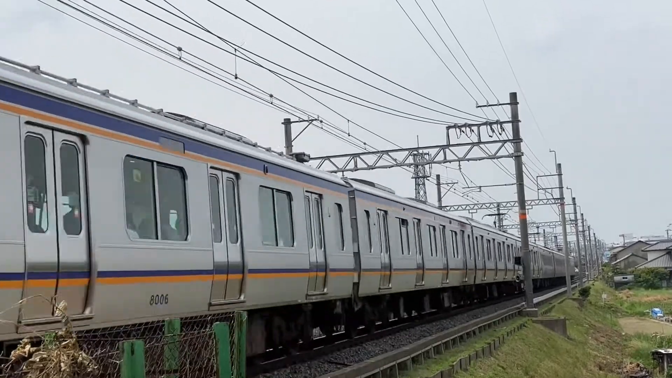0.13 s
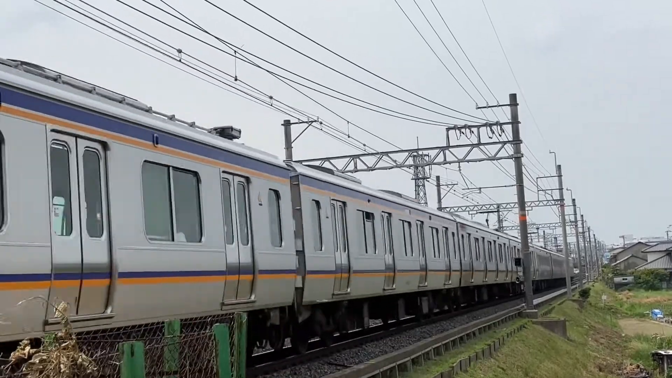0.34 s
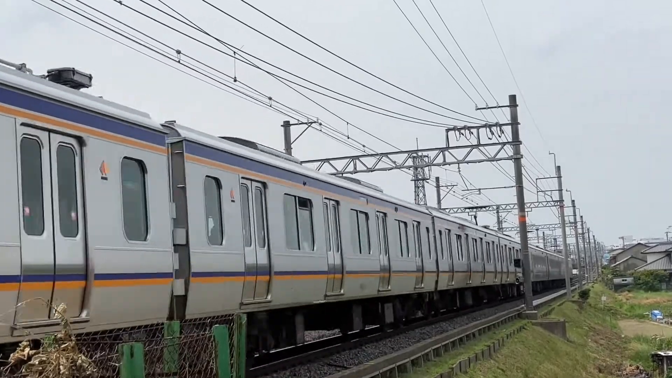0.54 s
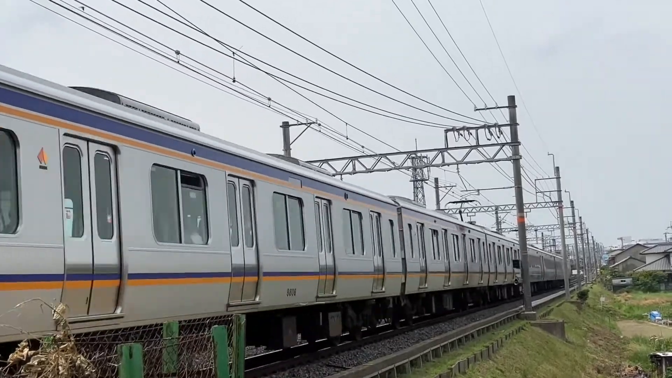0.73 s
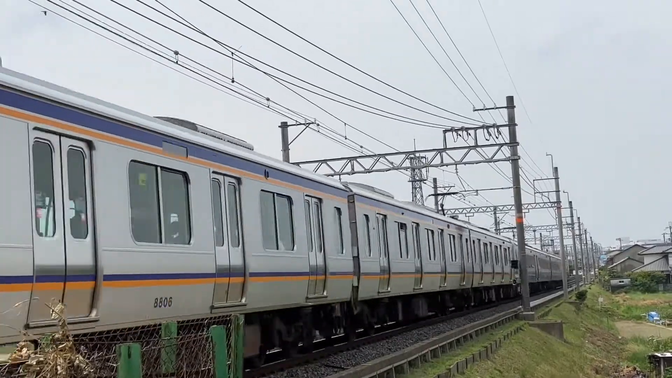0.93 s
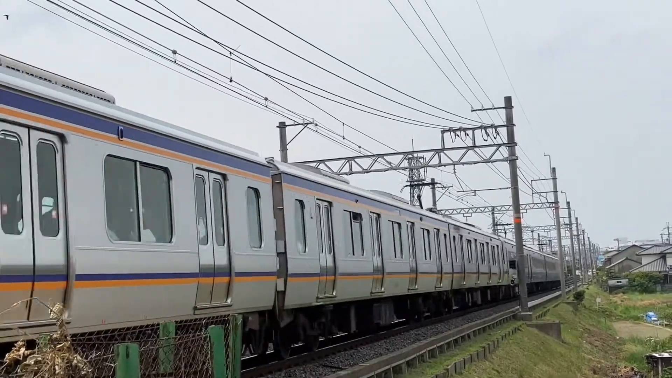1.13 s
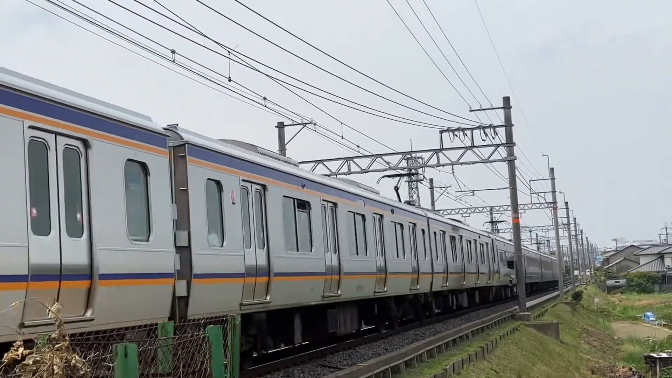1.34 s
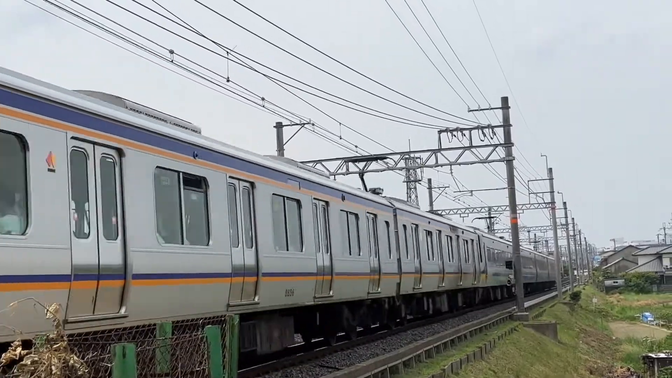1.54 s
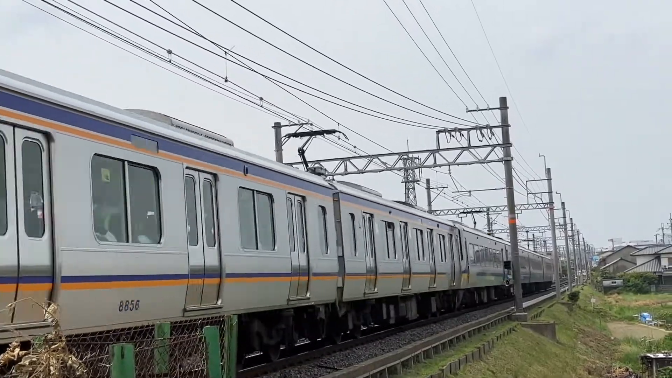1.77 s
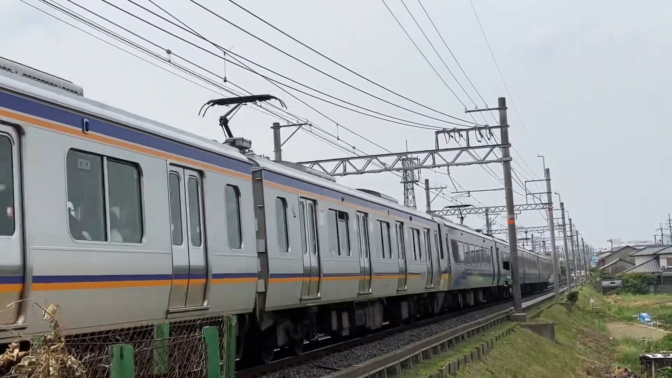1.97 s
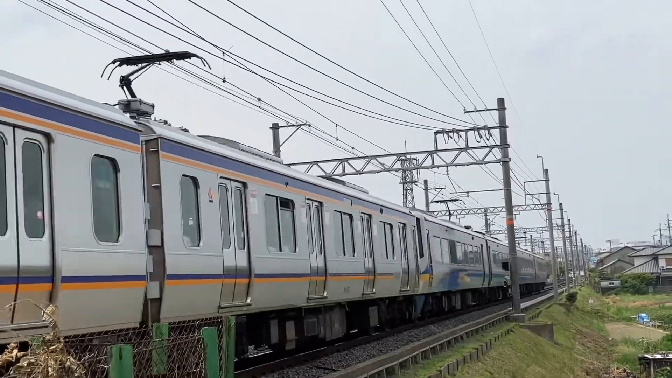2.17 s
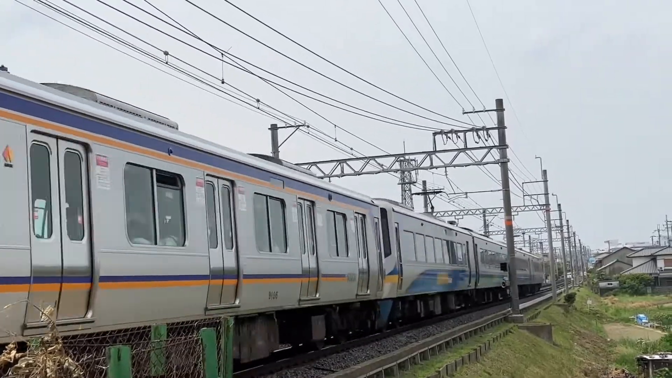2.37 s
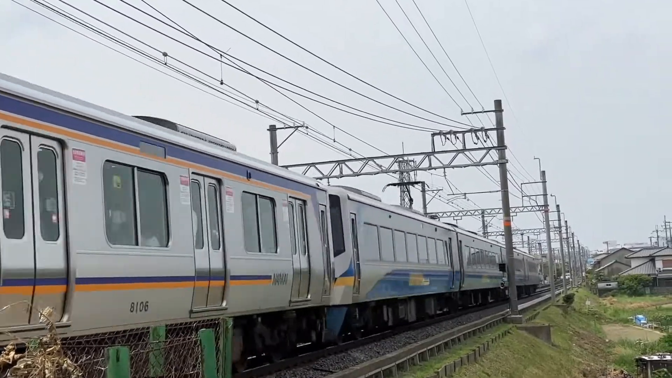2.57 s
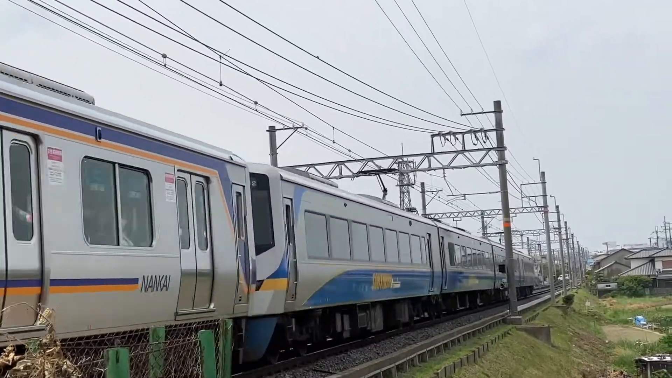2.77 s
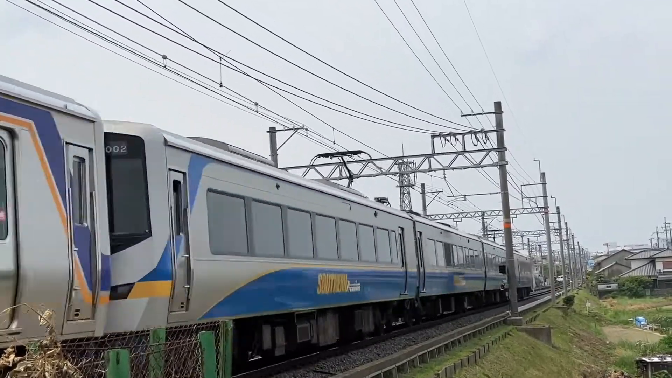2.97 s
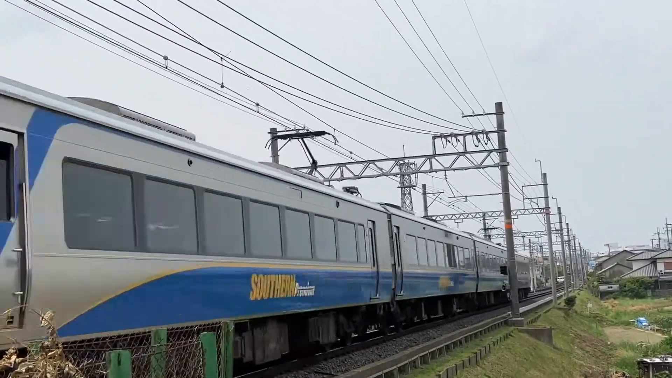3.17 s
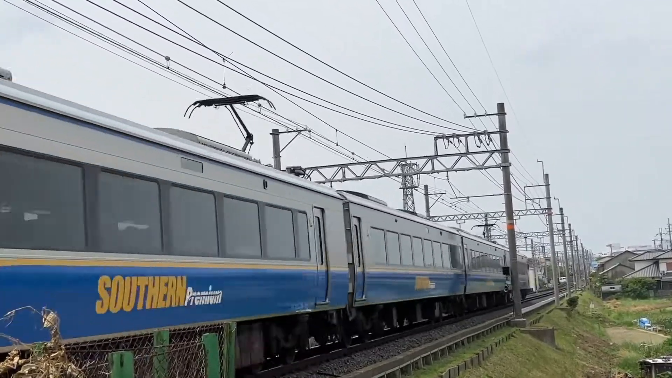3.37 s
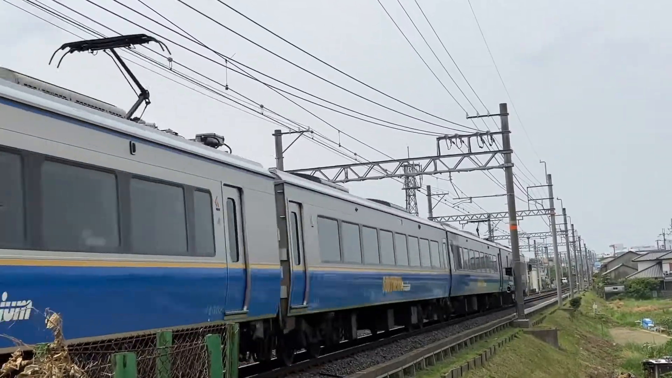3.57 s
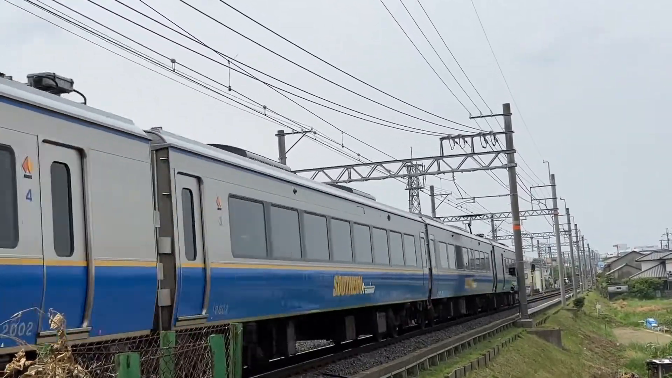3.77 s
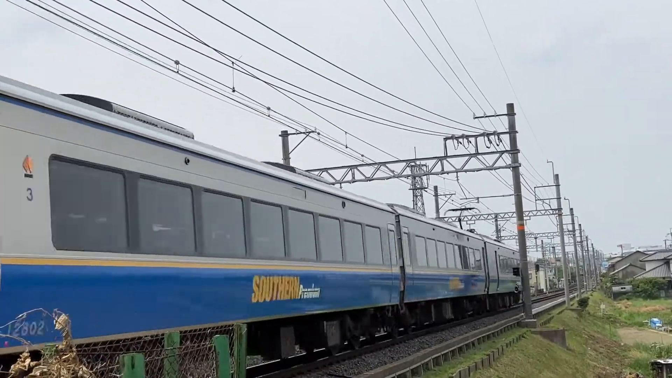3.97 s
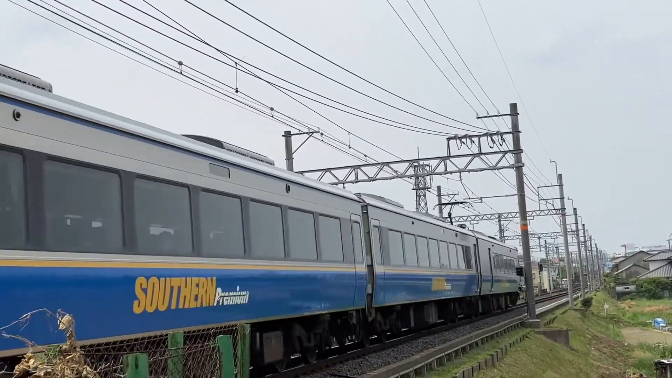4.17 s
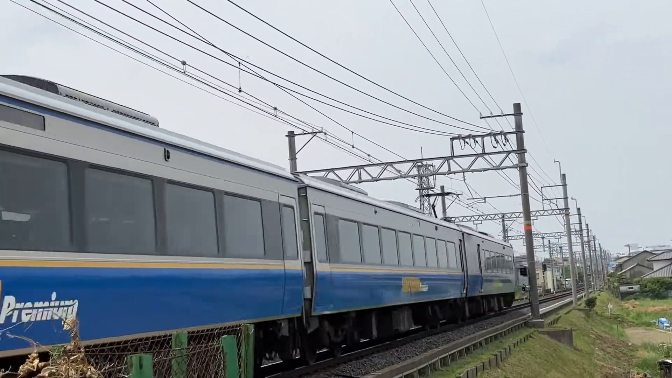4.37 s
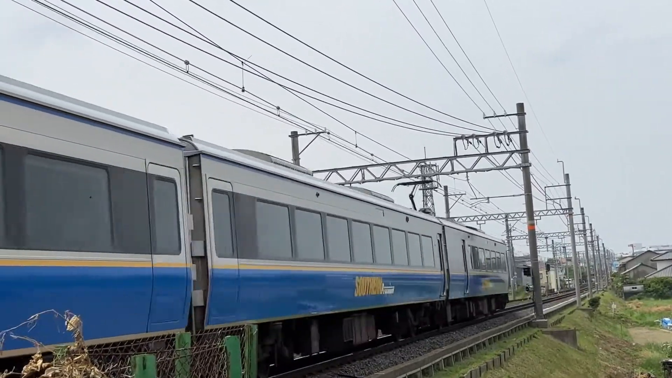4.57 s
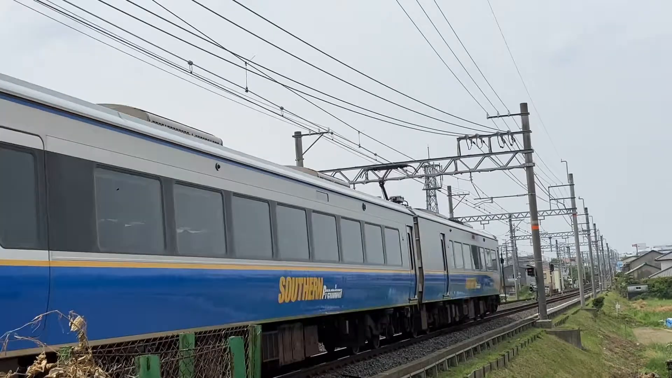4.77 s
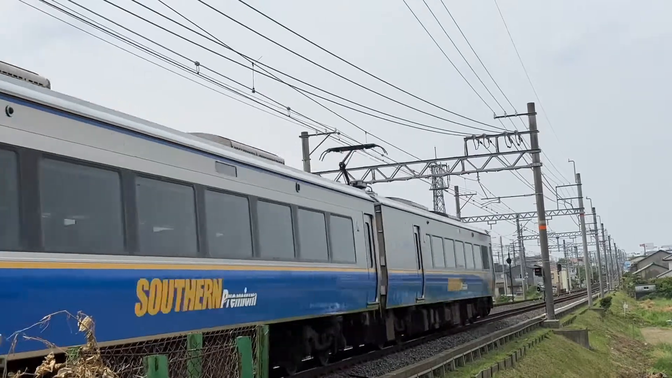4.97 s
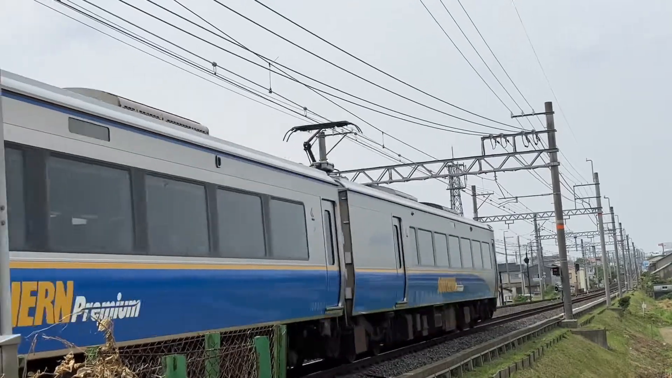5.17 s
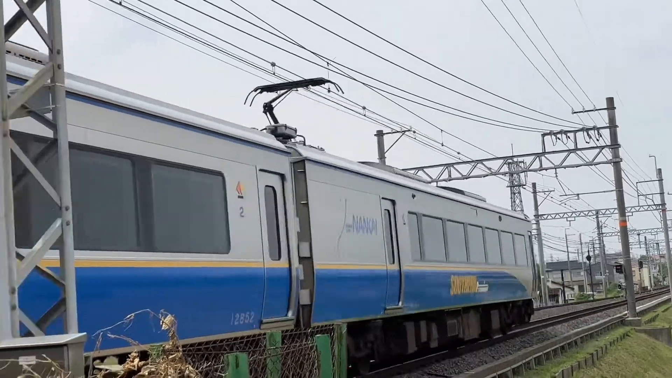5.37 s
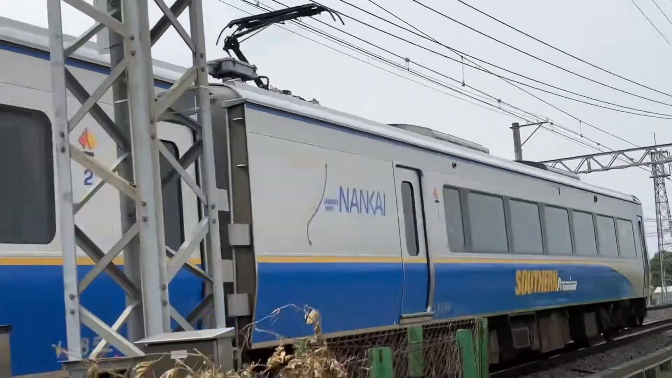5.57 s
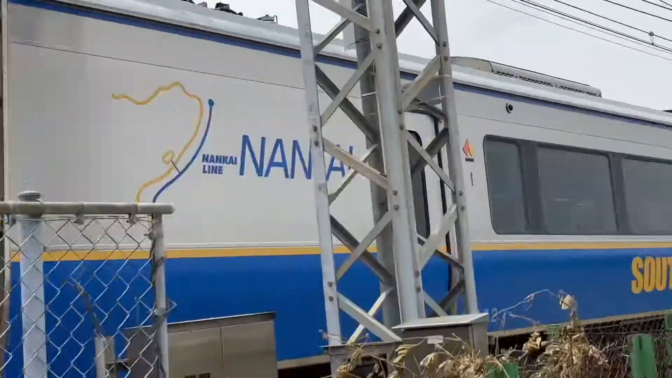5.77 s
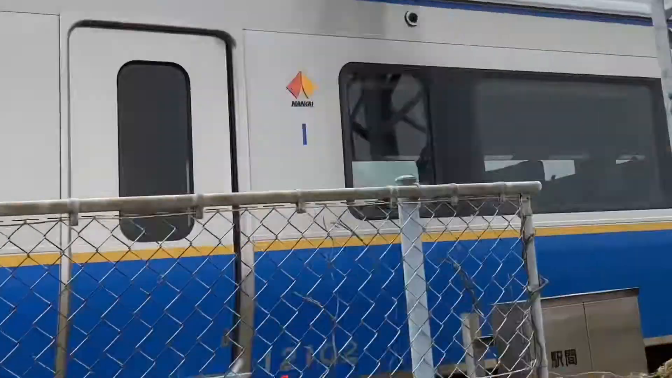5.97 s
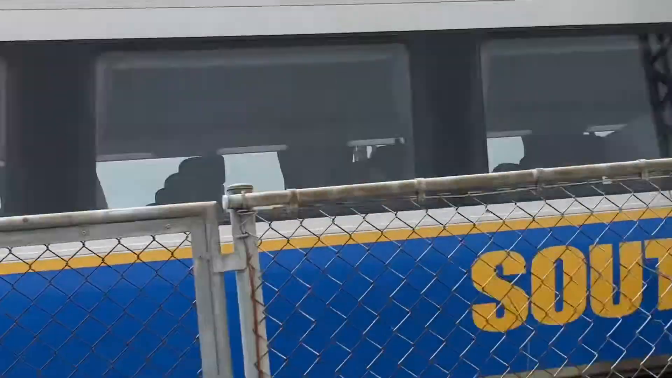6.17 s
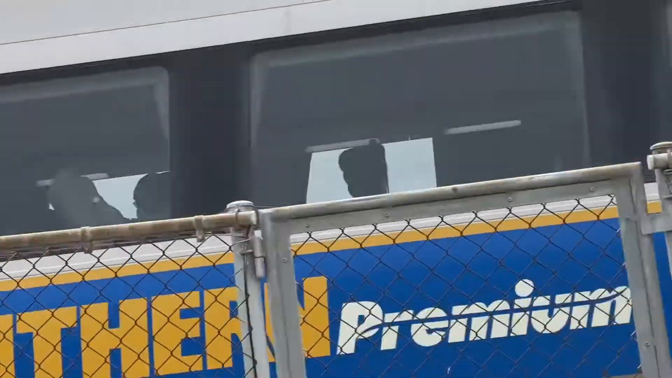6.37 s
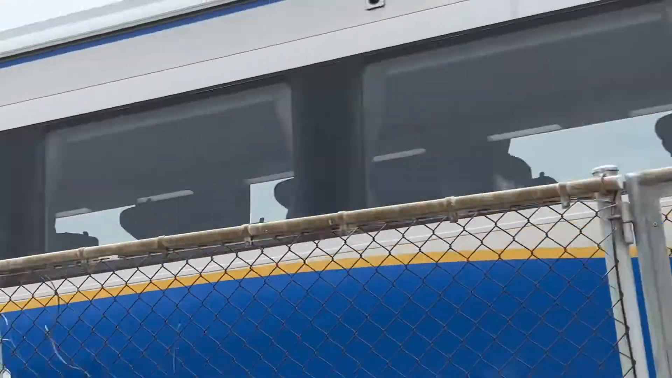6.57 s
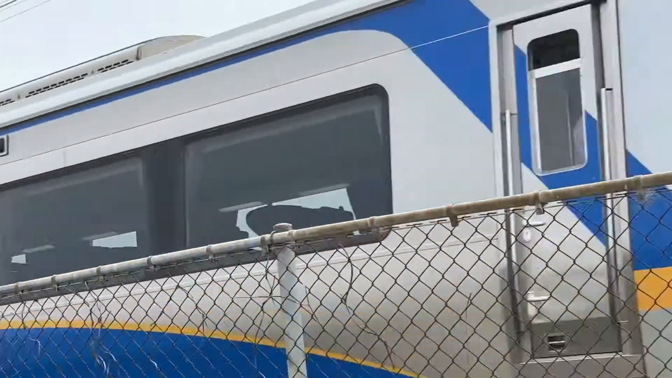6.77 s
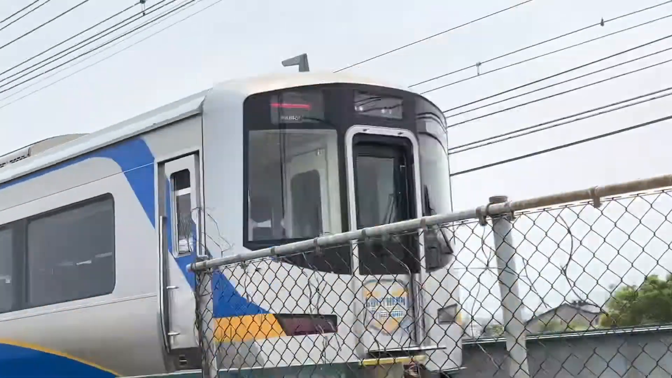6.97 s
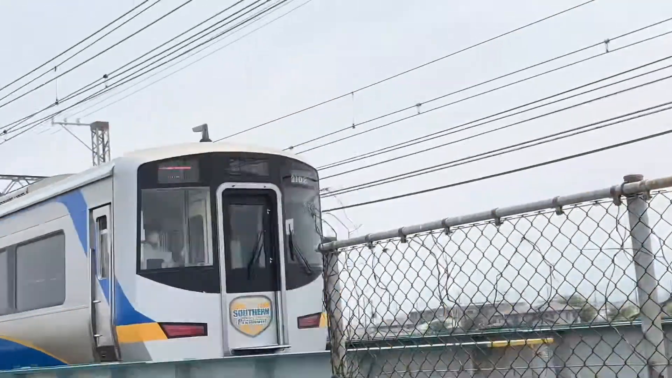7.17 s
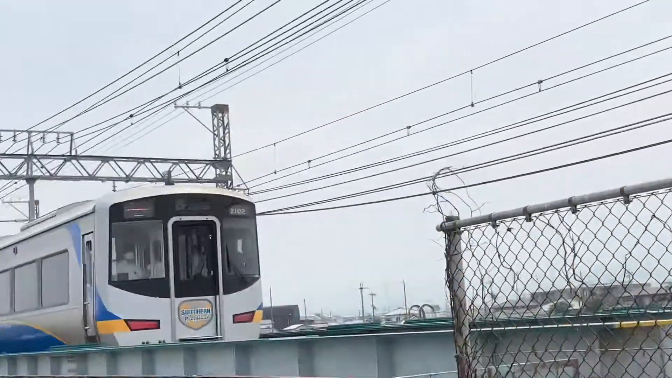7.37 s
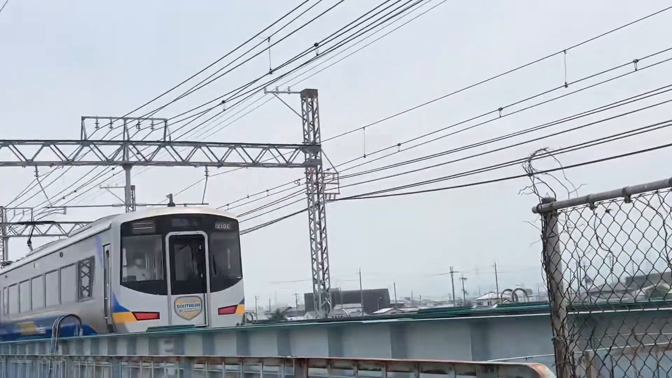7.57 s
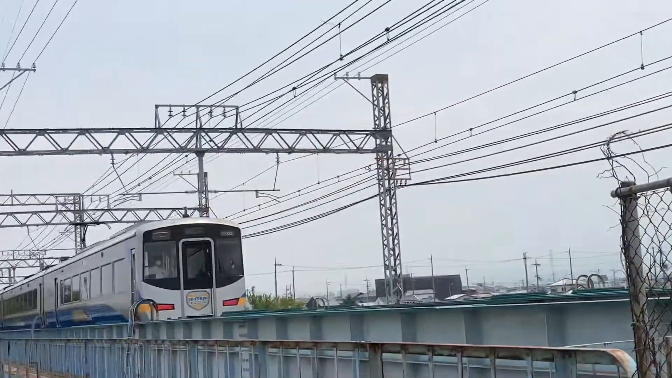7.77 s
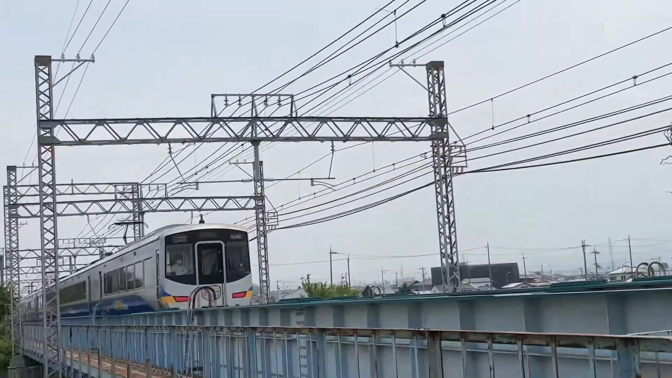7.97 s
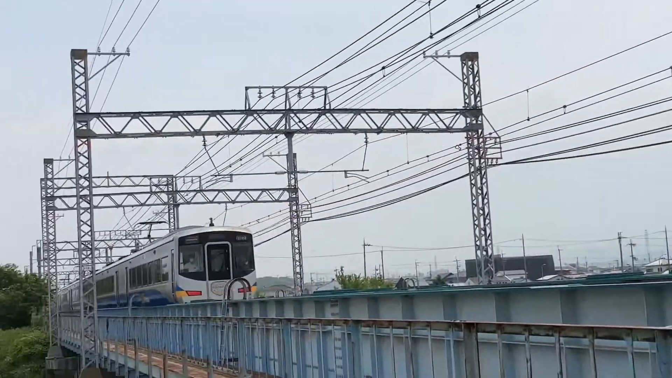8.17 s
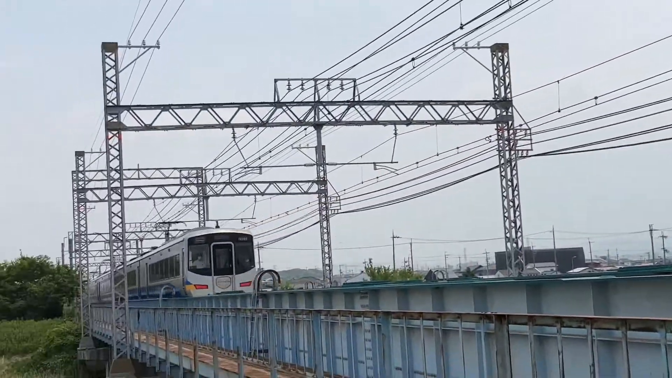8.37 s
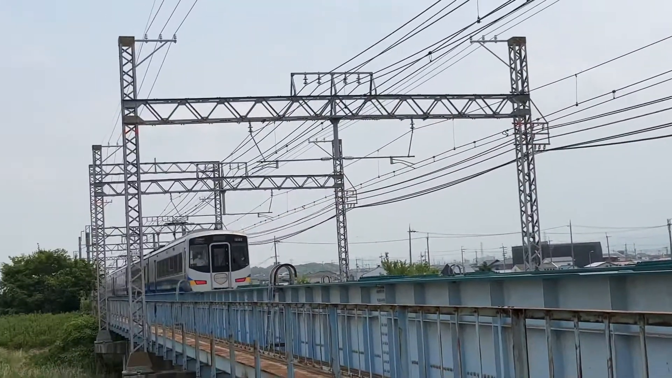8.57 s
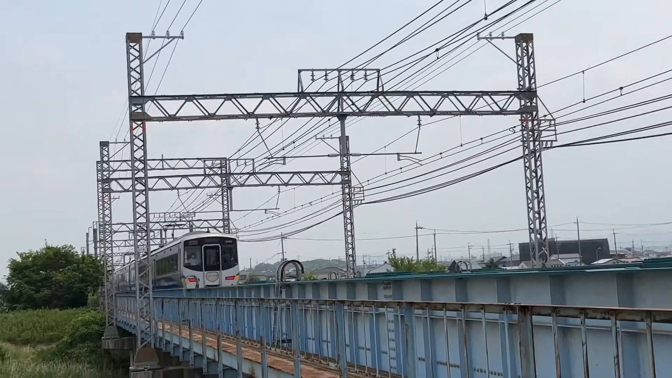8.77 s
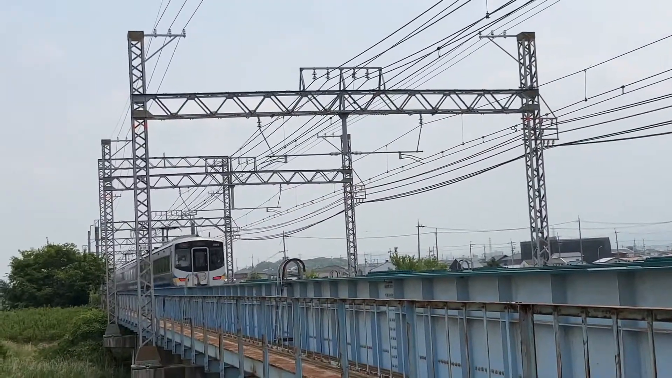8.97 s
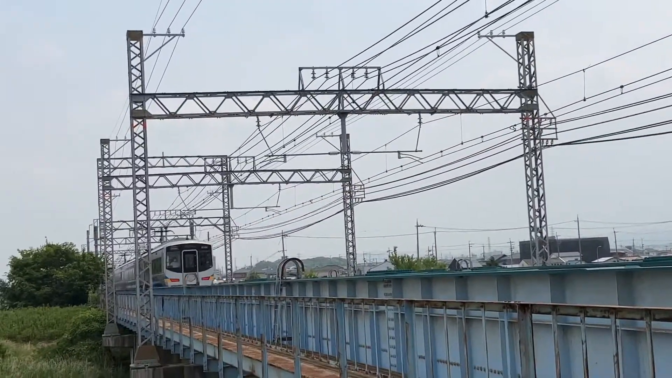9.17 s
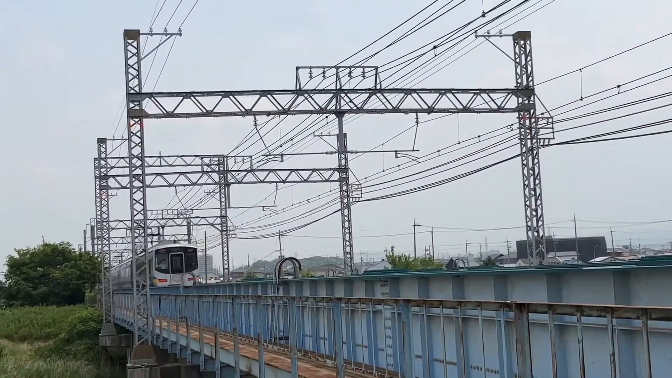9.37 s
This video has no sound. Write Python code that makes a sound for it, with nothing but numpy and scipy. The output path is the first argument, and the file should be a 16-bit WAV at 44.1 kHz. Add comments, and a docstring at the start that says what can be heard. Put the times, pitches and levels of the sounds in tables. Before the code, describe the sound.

Outdoors, a stereo microphone stands a few metres from a track as an electric train passes, already loud at 0 s. Deep ground rumble and low track roar carry ringing, hissing wheels; growling notes and light knocks stand out in the first second. From about 1 s a throbbing deep drone joins. Bogies cross a joint in quick double clacks, thump with metallic clang, in alternating gaps of roughly 0.3 and 0.5 s until 6.3 s. The roar eases around 2 s, swells from 2.6 to 4.2 s, thins near 5 s, then surges at 6 to 6.8 s as the last wheels rush by. From 7 s the tail recedes onto a steel bridge: low girder booms at 7.4 and 8.3 s, falling metallic chirps near 7.7 and 8.2 s, faint high zings and crackling hiss from 7.8 s, fading to a quiet distant rumble by 9.4 s.

```python
"""A train passes and leaves over a bridge

A train runs past a few metres away: the ground drones, the track growls and the wheels ring and hiss.
Each bogie (a frame with two axles) clacks twice over a rail joint; the blows are ringing tones and noise.
Later, from a steel girder bridge, come falling chirps and faint zings, made from delayed waves and sines.
Rolling sounds are coloured noise that swells and fades. Table levels are relative: functions add a trim."""
import sys
import numpy as np
from scipy import signal
from scipy.fft import rfft, irfft, next_fast_len
from scipy.io import wavfile

SR = 44100
rng = np.random.default_rng(int(sys.argv[2]) if len(sys.argv) > 2 else 0)


def store_pcm(level_fs):
    """Save levels as 16-bit WAV."""
    pcm = np.round(np.clip(level_fs, -1, 1) * 32767).astype(np.int16)
    wavfile.write(sys.argv[1], SR, np.atleast_2d(pcm).T)


N = 414981
TIME = np.arange(N) / SR  # seconds


def gain_of(db):
    """Turns decibels into a factor."""
    return np.exp(np.asarray(db) * np.log(10) / 20)


def evened(x):
    """Scales a sound to an rms of one."""
    return x / np.sqrt(np.mean(x ** 2) + 1e-20)


def read(points, hz):
    """Reads a table between its points on a log-frequency axis."""
    f, value = np.transpose(points)
    return np.interp(np.log(hz + 1), np.log(f + 1), value)


def follow(rows, t=TIME):
    """Reads every column of a table at the times t."""
    s, *columns = np.transpose(rows)
    return [np.interp(t, s, column) for column in columns]


def add(mix, s, sound):
    """Mixes a sound in at s seconds, cut off at the end of the mix."""
    part = mix[:, max(round(s * SR), 0):][:, :sound.shape[-1]]
    part += sound[..., :part.shape[1]]


def noise(spectrum, size=N):
    """Two unrelated noises of one colour, made from random frequency parts."""
    length = next_fast_len(size, real=True)
    colour = gain_of(read(spectrum, np.fft.rfftfreq(length, 1 / SR)))
    parts = rng.standard_normal((2, 2 * len(colour))).view(complex)
    return evened(irfft(parts * colour, length)[:, :size])


def ringing(modes, skirt):
    """Two unrelated noises in a set of resonances; a larger skirt makes their flanks steeper."""
    hz = np.geomspace(20, 20000, 1500)
    power = sum(gain_of(db) ** 2 / (1 + ((hz - f) / width) ** 2 * 2) ** skirt for f, width, db in modes)
    return noise(np.transpose([hz, 10 * np.log10(power)]))


def wander(rate_hz):
    """A slow random curve of rms one that moves up to about this rate."""
    t = TIME[::64]
    hz = np.fft.rfftfreq(len(t), t[1])
    slow = rfft(rng.standard_normal(len(t))) / (1 + (hz / rate_hz) ** 4)
    return np.interp(TIME, t, evened(irfft(slow, len(t))))


def receding(near, far, start, length):
    """Noise whose colour changes as the train moves from the ballast onto the bridge."""
    gone = np.clip((TIME - start) / length, 0, 1)
    return np.sqrt(1 - gone) * noise(near) + np.sqrt(gone) * noise(far)


def passing_notes(rows, doppler, blur_hz, level_db):
    """Blurred, dulled notes that swell as a wheel comes by and sink in pitch by the doppler share."""
    out = np.zeros((2, N))
    for s, db, hz, length in rows:
        u = np.linspace(-1, 1, int(length * SR))
        pitch = hz * (1 - doppler * u / 2) + blur_hz * rng.standard_normal((2, len(u)))
        tone = np.sqrt(2) * np.sin(2 * np.pi * np.cumsum(pitch, axis=1) / SR)
        note = np.cos(np.pi * u / 2) * tone
        dull = signal.butter(2, 4 * hz, fs=SR, output="sos")  # takes off the hiss
        add(out, s - length / 2, gain_of(level_db + db) * signal.sosfilt(dull, note))
    return out


def thud(modes, rise):
    """One blow on the track: its modes ring and die away, each a little out of tune."""
    t = np.arange(8192) / SR
    chance = rng.random((len(modes), 2, 2, 1))
    body = 0
    for (hz, db, t60), (detune, turn) in zip(modes, chance):
        pitch = hz * (1 + .16 * (detune - .5))
        body = body + gain_of(db - 60 * t / t60) * np.sin(2 * np.pi * pitch * t + turn)
    body = body * (1 - np.exp(-(t / rise) ** 2))
    return np.array([evened(side) for side in body])


THROB_PER_S, THROB_DIP_S = 3.7, 4.03  # beats a second; the time of one dip of the drone


def throbbing():
    """The beat of the passing cars, between -1 and 1; 1 is a dip of the drone."""
    return np.cos(2 * np.pi * THROB_PER_S * (TIME - THROB_DIP_S))


# How strongly the ground shakes: (time [s], rumble level [dB], drone level [dB])
GROUND = [(0, -17.5, -31), (.7, -21.5, -37), (1.05, -21, -18), (3.3, -24, -19.5), (4.6, -23.5, -21),
          (6.1, -26, -21.5), (6.6, -23.5, -17.5), (7.5, -22.5, -26.5), (8.6, -30.5, -38),
          (9.41, -31.5, -32)]
DRONE_HZ = 60.6


def drone(level_db=-5.0, waver=0.69, throb=0.47, unsteady_db=0.5):
    """The sprung weight of the bogies bounces on the track: one deep, wavering note that throbs."""
    phase = 2 * np.pi * DRONE_HZ * TIME + waver * wander(2.7)  # waver in radians
    swell = 1 - throb * throbbing()
    level = gain_of(level_db + follow(GROUND)[1] + unsteady_db * wander(9.3))
    return level * swell * np.sqrt(2) * np.sin(phase)


# The colour of the ground rumble: (frequency [Hz], strength [dB per Hz])
RUMBLE = [(15, -36), (30, -30), (45, -3), (80, 3), (100, -2), (135, -6.5), (180, -15), (260, -18.5),
          (600, -119)]


def ground_rumble():
    """Rough steel on steel shakes the ground: deep noise that follows the ground level."""
    return gain_of(follow(GROUND)[0]) * noise(RUMBLE)


# The boom of the sleepers: (frequency [Hz], width [Hz], level [dB])
SLEEPERS = [(115, 41, 0)]


def sleepers(level_db=-12.0, throb_db=6.0):
    """The sleepers boom in the ballast, loudest between the swells of the drone."""
    level = gain_of(level_db + follow(GROUND)[0] + throb_db * throbbing())
    return level * ringing(SLEEPERS, skirt=2.34)


# Wheels grazing the rail: (time [s], level [dB], pitch [Hz], octave level against the note [dB])
ZINGS = [(7.79, -61, 5550, -3), (7.891, -50, 5600, -4), (7.982, -56, 5630, -2), (8.022, -52, 5650, -5),
         (8.105, -57, 5520, 1), (8.37, -51, 5560, -6), (8.415, -58, 5620, 1), (8.462, -55, 5580, -4),
         (8.552, -61, 5600, -1), (8.604, -52.5, 5640, -6), (8.848, -64, 5620, -1), (8.904, -55, 5500, -8),
         (9.0, -54, 5490, -2), (9.208, -63, 5510, 3)]
# The thin note of the rail and its octave: (frequency [Hz], width [Hz], level [dB])
RAIL = [(5520, 260, 0), (11250, 800, -11)]


def zings(hiss, level_db=0.5, swell=0.013, sag=.02, sag_s=.012, blur_hz=740., sing_db=-5.0,
          fitful_db=4.0, start=5.7, loudest=7.0, stop=10.7):
    """The rail sings a thin high note and its octave; grazing wheels make it flare and sag in pitch."""
    out, t = np.zeros((2, N)), np.arange(4096) / SR
    for s, db, hz, octave_db in ZINGS:
        pitch = hz * (1 + sag * np.exp(-t / sag_s)) + blur_hz * rng.standard_normal((2, len(t)))
        phase = 2 * np.pi * np.cumsum(pitch, axis=1) / SR
        tone = np.sin(phase) + gain_of(octave_db) * np.sin(2 * phase)
        flare = t / swell * np.exp(1 - t / swell)
        add(out, s - swell, gain_of(db + level_db) * flare * tone)
    singing = np.interp(TIME, [start, loudest, stop], [0, 1, 0])
    singing = singing * gain_of(hiss + sing_db + fitful_db * wander(14))
    return out + singing * ringing(RAIL, skirt=2.2)


# Axles crossing a joint on the bridge: (time [s], chirp level [dB], tick level [dB])
FAR_JOINTS = [(7.648, -34, -48), (7.734, -31, -57), (8.187, -27, -44.5), (8.271, -21.5, -46)]
# The colour of the tick that runs ahead: (frequency [Hz], strength [dB per Hz])
TICK = [(1500, -12), (3000, 1), (5000, 0), (8000, -5), (11000, -4), (12500, -15), (16000, -40)]
# The colour of the spray that the girders scatter: (frequency [Hz], strength [dB per Hz])
SPRAY = [(1200, -12), (2500, 0), (4000, 0), (6000, -4), (8000, -13), (16000, -45)]


def far_joints(travel=0.015, high_db=-5.5, echo_db=-6.5, echo_t60=0.25, tick_lead=.006, tick_s=.006,
               spray_db=-28.5, spray_s=0.053, rail_hz=821.0, upper_hz=1248.0, bounce_db=-11.0, bounce=0.01):
    """Bending waves run faster the higher they are, so a distant blow arrives as a falling chirp."""
    out, t = np.zeros((2, N)), np.arange(16384) / SR
    hz = np.fft.rfftfreq(len(t), 1 / SR)
    colour = np.exp(-((hz - rail_hz) / 100) ** 2)
    colour += gain_of(high_db) * np.exp(-((hz - upper_hz) / 220) ** 2)
    colour += .02 / (1 + (hz / 2500) ** 3)
    delay = travel * np.minimum(rail_hz / (hz + 1), 2) ** 2  # seconds
    # adding up the delays over frequency gives the phase
    chirp = irfft(colour * np.exp(-2j * np.pi * np.cumsum(delay) * hz[1]))
    chirp = chirp / abs(chirp).max() * (1 - np.exp(-(t / .002) ** 2)) * np.array([[1], [.4]])
    girders = np.transpose([hz, 20 * np.log10(colour)])
    spray_shape = t / spray_s * np.exp(1 - t / spray_s)
    tick_shape = np.exp(-(t / tick_s - 2) ** 2)
    for s, db, tick in FAR_JOINTS:
        add(out, s, gain_of(db) * chirp)
        # the girders throw it back once, then ring on and scatter a soft spray
        add(out, s + bounce, gain_of(db + bounce_db) * chirp)
        echo = gain_of(db + echo_db - 60 * t / echo_t60) * noise(girders, size=len(t))
        add(out, s + travel / 2, echo)
        add(out, s - travel, gain_of(db + spray_db) * spray_shape * noise(SPRAY, size=len(t)))
        # the treble outruns the chirp as a short tick
        add(out, s - tick_lead - 2 * tick_s, gain_of(tick) * tick_shape * noise(TICK, size=len(t)))
    return out


# The girders booming under the last cars: (time of peak [s], level [dB], pitch [Hz], length [s])
BOOMS = [(7.36, -22.5, 111, .17), (7.38, -26.5, 199.6, .22), (7.72, -26, 95, 0.14), (8.27, -23, 97.2, .14),
         (8.28, -34.5, 285, 0.11), (8.44, -28, 111, .14), (8.45, -37.5, 281, .14), (8.61, -24, 93, .11)]


def girder_booms():
    """The girders boom in short, low, blurred notes."""
    return passing_notes(BOOMS, doppler=0.046, blur_hz=420.0, level_db=-2.0)


# Swells of wheel rush, close by and then from the girders: (time of peak [s], level [dB], length [s])
RUSHES = [(5.972, -30, 0.37), (6.54, -37, .25), (6.82, -27, 0.42), (7.33, -36, 0.24), (7.81, -42, 0.14),
          (8.07, -45, 0.17), (8.56, -51, 0.18), (8.92, -44, .42), (9.355, -47, .14)]
# The colour of those swells: (frequency [Hz], strength [dB per Hz])
RUSH = [(500, -13), (1100, -3), (1500, -3.5), (1850, 0), (2300, -3.5), (2600, -9), (3200, -25), (6000, -55)]


def rushes():
    """Broad swells of wheel noise as the last bogies go by and run out over the bridge."""
    swell = 0
    for s, db, length in RUSHES:
        swell = swell + gain_of(db) * np.cos(np.pi * np.clip((TIME - s) / length, -.5, .5))
    return swell * noise(RUSH)


# Hiss from far down the bridge, also the colour of the crackle: (frequency [Hz], strength [dB per Hz])
FAR_HISS = [(2000, -9), (2900, -5), (3800, 9), (5600, 4.5), (7200, 2.5), (8800, -5.5), (11500, -4.5),
            (13000, -15), (16000, -30)]


def crackle(hiss, per_s=22., level_db=-4.0, t60=0.23, spread_db=1.0):
    """Crackle in the treble: short fading noise bursts at random times, following the hiss level."""
    strike = rng.random(N) < per_s / SR
    size = gain_of(spread_db * np.minimum(rng.exponential(1, N), 3)) * strike
    t = np.arange(4096) / SR
    burst = gain_of(-60 * t / t60) * noise(FAR_HISS, size=len(t))
    bursts = signal.oaconvolve(size[None], burst, axes=1)[:, :N]
    return gain_of(level_db + hiss) * evened(bursts)


# The colour of the hiss close by: (frequency [Hz], strength [dB per Hz])
HISS = [(1200, -20), (2600, -2), (3700, .5), (5500, -3.8), (7500, -5), (9000, -9.5), (11000, -9.8),
        (13500, -15), (16000, -16.5)]


def wheel_hiss(hiss, level_db=2.5, flutter_db=0.63):
    """Rough steel on steel hisses: fluttering high noise, first near and then from the bridge."""
    level = gain_of(level_db + hiss + flutter_db * wander(29))
    return level * receding(HISS, FAR_HISS, start=7.34, length=0.92)


# The train's weight and wheels on the track; the motor cars are the loud stretches:
# (time [s], track roar level [dB], rolling noise level [dB])
PASSING = [(0, -16.5, -20.5), (.3, -15, -20.5), (.82, -17, -23), (1.25, -26, -29.5), (2.0, -30.5, -31),
           (2.65, -22.5, -25), (3.05, -21, -25.5), (3.55, -21.5, -26), (4.14, -21, -28.5),
           (4.4, -28.5, -30.5), (4.8, -33, -34), (5.45, -30.5, -32.5), (5.95, -23.5, -26.5),
           (6.3, -21, -30.5), (6.52, -21, -27), (6.83, -23, -27), (7.15, -29.5, -33.5), (7.36, -27.5, -32),
           (7.75, -36, -39), (9.2, -41, -45.5), (9.41, -38.5, -40.5)]
# Resonances of the track: (frequency [Hz], width [Hz], level [dB])
TRACK = [(246, 97, -1.5), (281, 28, -2), (358, 61, -7.5)]
# The colour of rolling noise close by: (frequency [Hz], strength [dB per Hz])
ROLLING = [(150, -15), (350, 1), (470, 3.5), (600, 0), (765, 5), (860, -2.5), (1050, 2.5), (1550, -1.5),
           (2000, -7.5), (3000, -24.5), (6000, -57)]
# The colour of rolling noise from the bridge: (frequency [Hz], strength [dB per Hz])
BRIDGE = [(60, -25), (100, 9), (190, -3), (350, 5), (430, -1.5), (560, 5), (800, 1.5), (900, -1), (1300, 0),
          (2100, -3.5), (2450, -7.5), (2900, -16), (6000, -39)]


def rolling(roar_db=-3.0, roll_db=2.0, lumps_db=1.64, rattle_db=1.41):
    """Rough steel on steel makes the track roar and the wheels rumble; rough spots lift both together."""
    roar, roll = follow(PASSING)
    spots = wander(20.5)
    out = gain_of(roar_db + roar + lumps_db * spots) * ringing(TRACK, skirt=1.26)
    wheel_noise = receding(ROLLING, BRIDGE, start=6.6, length=0.64)
    return out + gain_of(roll_db + roll + rattle_db * spots) * wheel_noise


# Wheels growling over rippled rail: (time of peak [s], level [dB], pitch [Hz], length [s])
GROWLS = [(.2, -28, 290, 0.29), (.46, -15, 264.5, 0.16), (.6, -15, 296.7, 0.17), (.78, -18.5, 290, .2),
          (1.0, -23, 262, 0.23), (2.55, -22.5, 296, 0.23), (2.8, -24, 265.8, 0.31),
          (2.95, -21, 289.6, 0.14), (3.33, -24, 293.4, 0.19), (3.56, -21.5, 257.5, .15),
          (3.79, -16.5, 300.3, .16), (3.97, -22, 281, .16), (4.08, -22.5, 290, 0.22),
          (5.77, -21.5, 304, .17), (6.02, -26.5, 271.6, 0.21), (6.53, -17, 286.3, .13),
          (6.68, -21, 261.3, 0.17)]


def growls():
    """Wheels growl over rippled rail in low, blurred notes."""
    return passing_notes(GROWLS, doppler=0.065, blur_hz=286.0, level_db=-2.5)


# Each bogie crosses the near joint, then rolls by: (time at the joint [s], thump level [dB],
# clang level [dB], second axle against the first [dB], wheel ring level [dB], hiss level [dB])
BOGIES = [(-.012, -13.5, -20.5, -0.5, -21.5, -33.5), (.518, -10.5, -26, -2, -24, -39),
          (.785, -8, -25.5, -2, -24, -43), (1.314, -10.5, -24.5, -2.5, -29, -44),
          (1.588, -10, -25, -2, -26, -46), (2.12, -12.5, -26.5, -3, -32.5, -46),
          (2.397, -12.5, -24, -1, -24, -40), (2.934, -15, -28.5, -9, -25, -40.5),
          (3.214, -10.5, -25.5, -2, -25, -42), (3.755, -14.5, -31.5, 0, -28, -40.5),
          (4.023, -14, -26, -0.5, -27, -46), (4.56, -13.5, -30.5, -2.5, -29, -48),
          (4.842, -13.5, -26, -3, -29.5, -45), (5.378, -12, -29.5, -2, -31.5, -55),
          (5.659, -12.5, -25, -4.5, -28, -38), (6.2, -11, -29, -7, -26, -37.5)]
SPEED_M_PER_S, AXLE_SPACING_M = 24.6, 2.1
JOINT_AHEAD_M, DISTANCE_M = 7.93, 3.88  # the joint lies up the line; the near rail is a few metres off


def going_by(strengths_db, falloff):
    """Level in dB of all the bogies together: each swells as it comes abreast and fades with distance."""
    power, t = 0, TIME[::64]
    for (s, *_), db in zip(BOGIES, strengths_db):
        along_m = SPEED_M_PER_S * (t - s) - JOINT_AHEAD_M
        power = power + gain_of(db) ** 2 / (1 + (along_m / DISTANCE_M) ** 2) ** falloff
    return np.interp(TIME, t, 10 * np.log10(power))


# Air closing in behind the last car, then the last bogie running onto the girders:
# (time [s], length [s], ring level [dB], hiss level [dB])
WAKE = (7, 0.41, -27, -42.5)
ONTO_BRIDGE = (7.5, 0.29, -33, -44)
# once the tail has passed, no car side throws the wheel noise back
TAIL_S, TAIL_FADE_S, TAIL_DB = 6.85, 0.23, -7.5


def wheel_levels(ring_falloff=1.28, hiss_falloff=0.97):
    """Wheel ring and hiss in dB: the bogies going by, then the wake and the run onto the bridge."""
    *_, ring_db, hiss_db = np.transpose(BOGIES)
    power = gain_of([going_by(ring_db, ring_falloff), going_by(hiss_db, hiss_falloff)]) ** 2
    for s, length, *db in (WAKE, ONTO_BRIDGE):
        power = power + gain_of(db)[:, None] ** 2 * np.exp(-((TIME - s) / length) ** 2)
    return 10 * np.log10(power) + TAIL_DB * np.clip((TIME - TAIL_S) / TAIL_FADE_S, 0, 1)


# Resonances of the wheels: (frequency [Hz], width [Hz], level [dB])
WHEELS = [(1740, 47, 6.5), (1870, 87, 7), (2083, 108, 6), (2240, 280, 1.5), (2437, 235, -3.5),
          (2760, 1100, -9)]


def wheel_ring(ring, level_db=-2.5, swap_db=2.0):
    """Rough steel on steel sets the wheels ringing; their modes take turns to stand out."""
    wheels = 0
    for hz, width, db in WHEELS:
        level = gain_of(db + swap_db * wander(14.0)) * np.sqrt(width)
        wheels = wheels + level * ringing([(hz, width, 0)], skirt=1.8)
    return gain_of(level_db + ring) * evened(wheels)


def strands(ring, count=110, level_db=-14.5, scatter=.05, length=.14, spread_db=3.):
    """Now one wheel, now another rings briefly near a mode, louder as a bogie comes abreast."""
    when, mode, detune, size = rng.random((count, 4)).T
    s = (np.arange(count) + when) / count * TAIL_S
    mode_hz = np.array(WHEELS)[(mode * len(WHEELS)).astype(int), 0]
    hz = mode_hz * (1 + scatter * (2 * detune - 1))
    db = np.interp(s, TIME, ring) + spread_db * (2 * size - 1)
    rows = [(a, b, c, length) for a, b, c in zip(s, db, hz)]
    return passing_notes(rows, doppler=0.031, blur_hz=480., level_db=level_db)


# Single wheels ringing out as they go by: (time of peak [s], level [dB], pitch [Hz], length [s])
WHEEL_CALLS = [(0.25, -26.5, 2090, 0.24), (.33, -29.5, 2285, .22), (.79, -32, 1900, .14),
               (0.881, -29.5, 2107, 0.25), (1.72, -36, 2099, .3), (2.335, -28.5, 1472, 0.3),
               (2.72, -28.5, 2120, 0.21), (3.558, -26, 2062, 0.24), (4.062, -31, 2290, 0.17),
               (4.235, -30, 1930, .12), (4.41, -40, 2220, .14), (5.002, -27, 1830, 0.12),
               (5.26, -30.5, 2084, 0.14), (5.8, -32, 2175, .26), (6.0, -34, 1650, .2),
               (6.22, -35, 2820, 0.3), (6.41, -38, 3060, .2), (6.5, -34, 2190, .16), (6.7, -34.5, 2900, .3),
               (6.87, -29, 1763, 0.2)]


def wheel_calls():
    """Single wheels ring out in high, blurred notes."""
    return passing_notes(WHEEL_CALLS, doppler=0.0229, blur_hz=880.0, level_db=-1.0)


# Flat spots on the wheels knocking on the rail: (time [s], level [dB])
KNOCKS = [(.212, -20.5), (.318, -22), (.412, -28), (.726, -21), (2.68, -24.5), (2.86, -29), (3.105, -29),
          (3.425, -26), (3.537, -24), (3.607, -25.5), (4.143, -26)]
# What a struck joint rings with: (frequency [Hz], level [dB], time to fall by 60 dB [s])
JOINT = [(129, 2.5, 0.082), (162, 2.5, 0.088), (246, -7.5, 0.12), (324.7, -2, 0.14), (398.4, 0, 0.077)]


def knocks(level_db=-5.5):
    """A flat spot is a lighter blow than a joint: only the upper modes of the track ring."""
    out, upper = np.zeros((2, N)), JOINT[2:]
    for s, db in KNOCKS:
        add(out, s, gain_of(level_db + db) * thud(upper, rise=0.0043))
    return out


def axles():
    """Two blows for each bogie, one axle spacing apart: (time [s], thump [dB], clang [dB])."""
    for s, thump, clang, rear, *_ in BOGIES:
        if s > 0:  # the very first axle has already crossed
            yield s, thump, clang
        yield s + AXLE_SPACING_M / SPEED_M_PER_S, thump + rear, clang + rear


# The colour of the clang: (frequency [Hz], strength [dB per Hz])
CLANG = [(150, -41), (350, -6), (520, 7), (780, 4), (1250, 9.5), (1700, -12), (3000, -17.5), (8000, -21.5),
         (16000, -92)]


def clacks(thump_db=-13.5, clang_db=7.5, spread=0.012, clang_t60=0.21, lead=.015, thump_lead=0.004):
    """Each axle drops into the joint: a clang runs ahead through the rail, then rail and sleepers thump."""
    out, t = np.zeros((2, N)), np.arange(8192) / SR
    rise = 1 - np.exp(-(t / spread) ** 2)
    clang_shape = rise * gain_of(-60 * np.maximum(t - spread, 0) / clang_t60)
    for s, thump, clang in axles():
        add(out, s - thump_lead, gain_of(thump + thump_db) * thud(JOINT, rise=0.0061))
        add(out, s - lead, gain_of(clang + clang_db) * clang_shape * noise(CLANG, size=len(t)))
    return out


# Where the nearest wheels are heard from: (time [s], lead of the left microphone [ms])
BEARING = [(0, .39), (5.3, 0.4), (5.78, 0.4), (6.0, 0.04), (6.45, -0.22), (8.3, -0.15), (8.6, -0.18)]
# Share of the sound that comes straight from the wheels: (frequency [Hz], share [0-1])
DIRECT = [(60, .7), (400, .85), (900, .8), (1500, .75), (2300, .75), (4000, .3), (8000, .08), (15000, 0)]
# A narrow band that drifts in pitch and dips or lifts: (time [s], centre [Hz], level change [dB])
HOLLOW = [(5.9, 2800, 0), (6.2, 2600, 1), (6.6, 2450, -1.5), (7.0, 2300, -3.5), (7.7, 2780, 1),
          (8.6, 2950, -2), (9.41, 3030, -10)]
HOLLOW_WIDTH_HZ = 160
MIC_SPAN_MS = 0.45  # time for sound to cross from one microphone to the other
LIKENESS = 0.96  # the two microphones never hear quite the same
BOGIES_PER_S, SWEEP_MS = 2.45, 0.026  # each passing bogie swings the bearing this far either way


def microphones(pair):
    """Two spaced microphones: direct sound reaches one first, scattered sound is alike only in the bass."""
    hz, t, (near, other) = signal.stft(pair, SR, nperseg=512, noverlap=384)
    sweep = 2 * ((t * BOGIES_PER_S + .55) % 1) - 1
    lead_ms = follow(BEARING, t)[0] + SWEEP_MS * sweep
    khz, direct = hz[:, None] / 1000, read(DIRECT, hz)[:, None]
    scattered = (1 - direct) * np.sinc(2 * khz * MIC_SPAN_MS)
    same = LIKENESS * (direct * np.exp(-2j * np.pi * khz * lead_ms) + scattered)
    # the unrelated noise fills in whatever the two sides do not share
    right = same * near + np.sqrt(np.maximum(1 - abs(same) ** 2, 0)) * other
    centre, change_db = follow(HOLLOW, t)
    hollow = gain_of(change_db * np.exp(-((hz[:, None] - centre) / HOLLOW_WIDTH_HZ) ** 2))
    return signal.istft(hollow * np.array([near, right]), SR, nperseg=512, noverlap=384)[1][:, :N]


def scene():
    """The whole train, heard from beside the track; the drone is alike on both sides."""
    ring, hiss = wheel_levels()
    far = zings(hiss) + far_joints() + girder_booms()
    track = ground_rumble() + sleepers() + rolling() + growls()
    wheels = rushes() + crackle(hiss) + wheel_hiss(hiss) + wheel_ring(ring) + strands(ring) + wheel_calls()
    blows = knocks() + clacks()
    return microphones(far + track + wheels + blows) + drone()


# Left microphone against the right: (frequency [Hz], level difference [dB])
TILT = [(60, -0.5), (110, -1), (200, -1), (380, 0.5), (700, 1.5), (1290, 0.5), (2380, 0.5), (4400, 0),
        (8120, -1), (15000, 1)]
EDGE_HZ = 15750  # nothing much is heard above this


def record(dry):
    """The two microphones differ a little in colour; then the highest treble is cut."""
    length = next_fast_len(N, real=True)
    hz = np.fft.rfftfreq(length, 1 / SR)
    tilt = gain_of(read(TILT, hz) * np.array([[.5], [-.5]]))  # half to each side
    coloured = irfft(rfft(dry, length) * tilt, length)[:, :N]
    low_pass = signal.firwin(1023, EDGE_HZ, window=("kaiser", 9), fs=SR)
    return signal.oaconvolve(coloured, low_pass[None], "same")


dry = scene()
out = record(dry)
store_pcm(out)
```